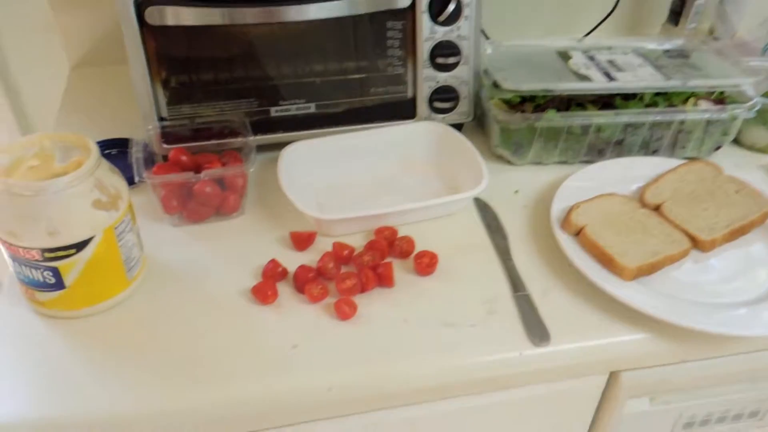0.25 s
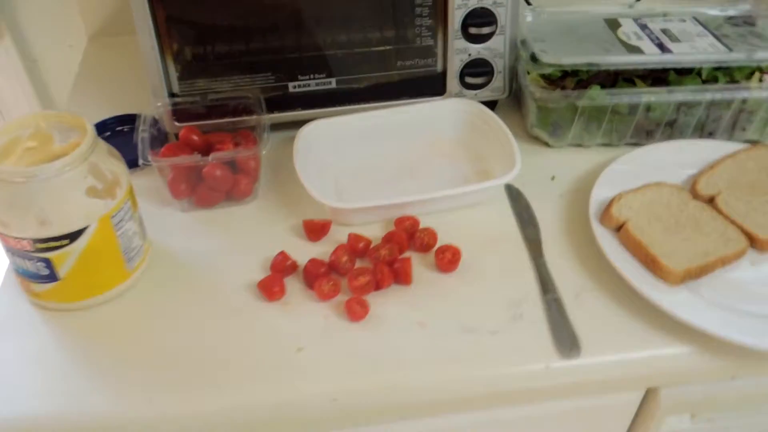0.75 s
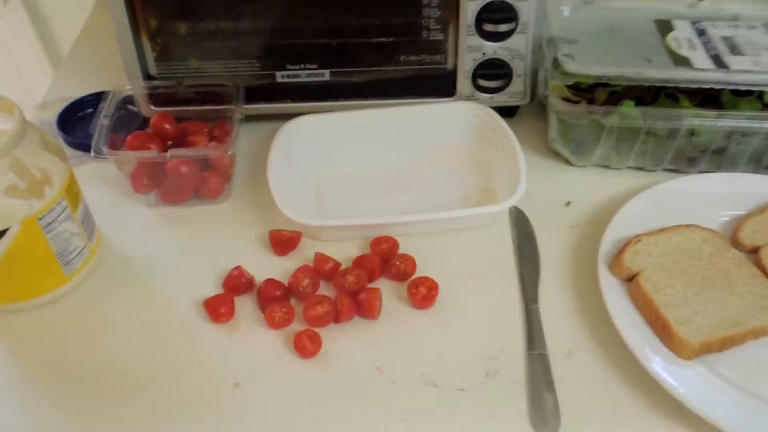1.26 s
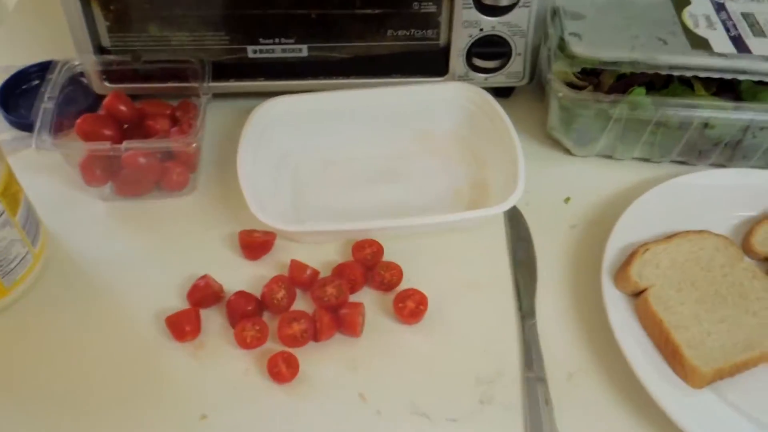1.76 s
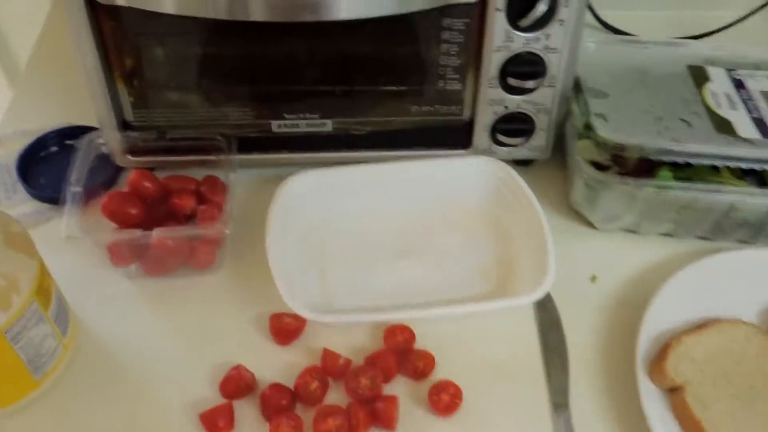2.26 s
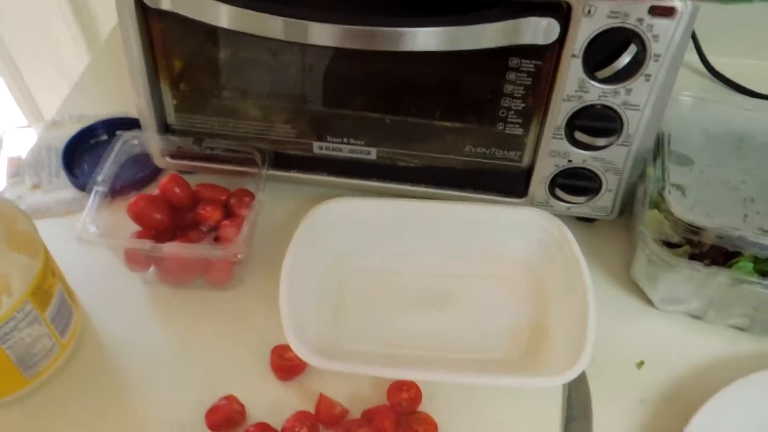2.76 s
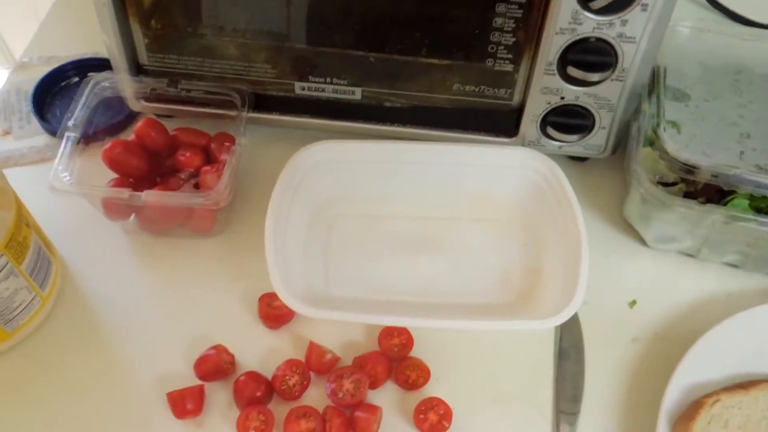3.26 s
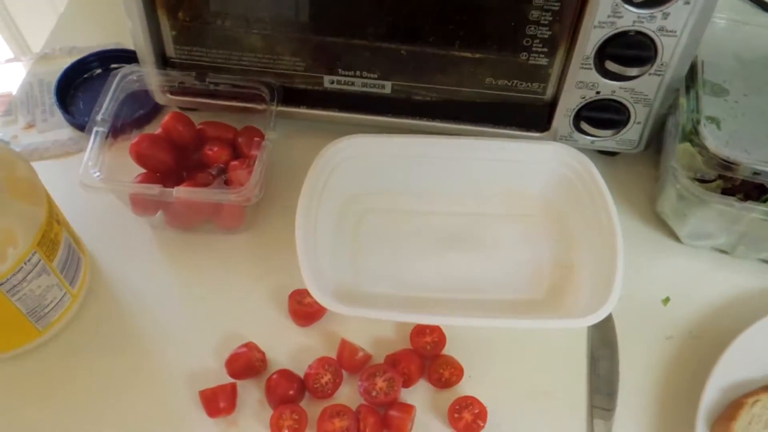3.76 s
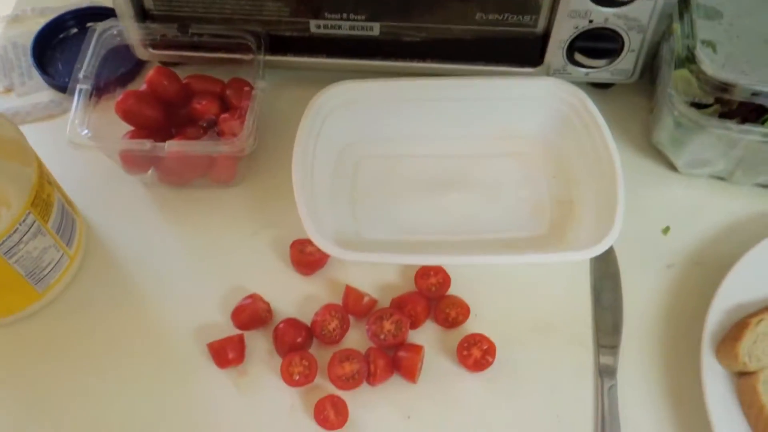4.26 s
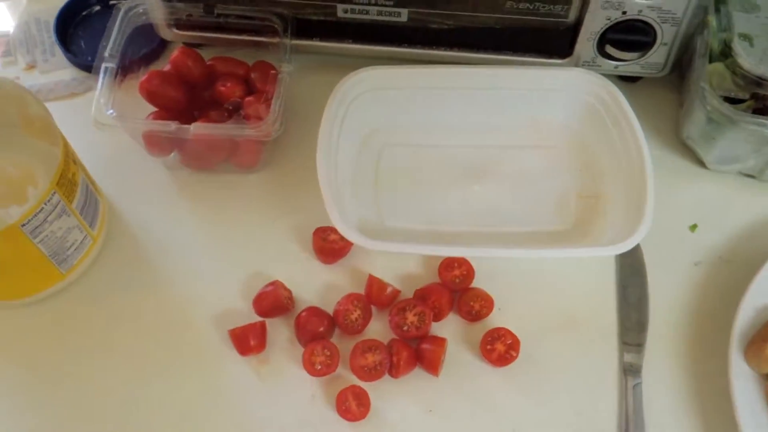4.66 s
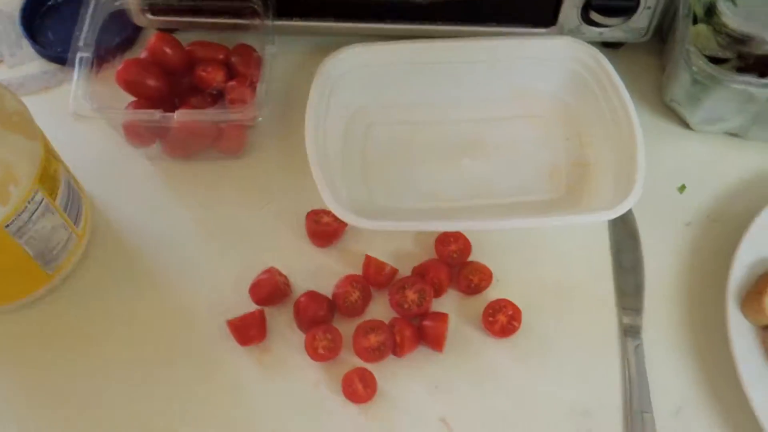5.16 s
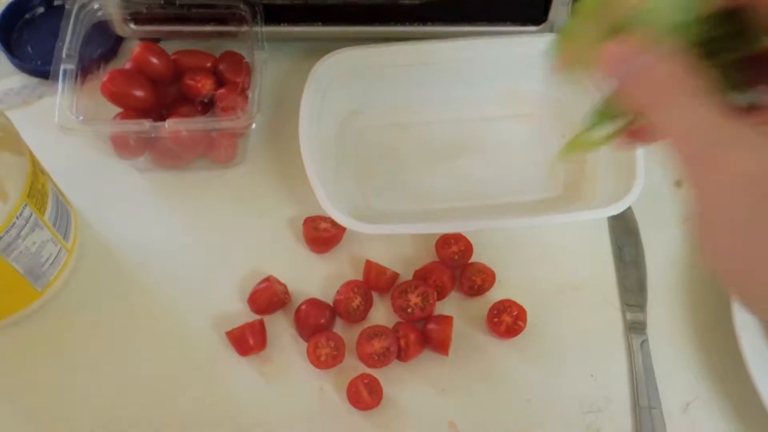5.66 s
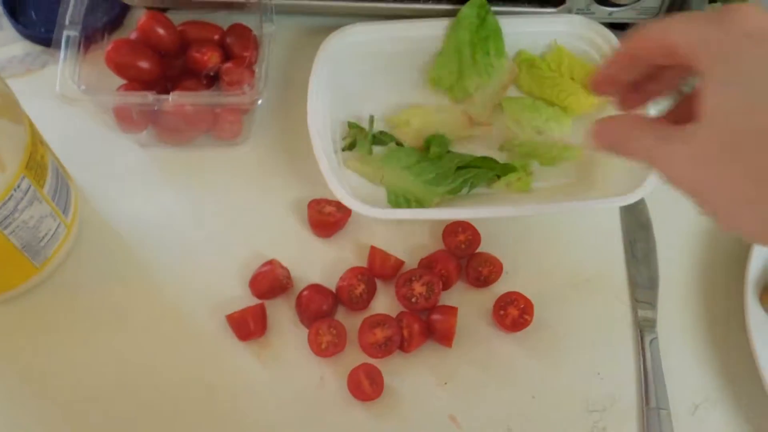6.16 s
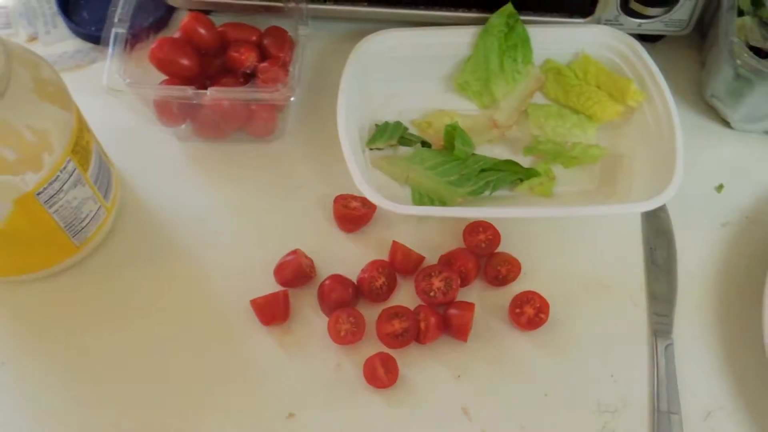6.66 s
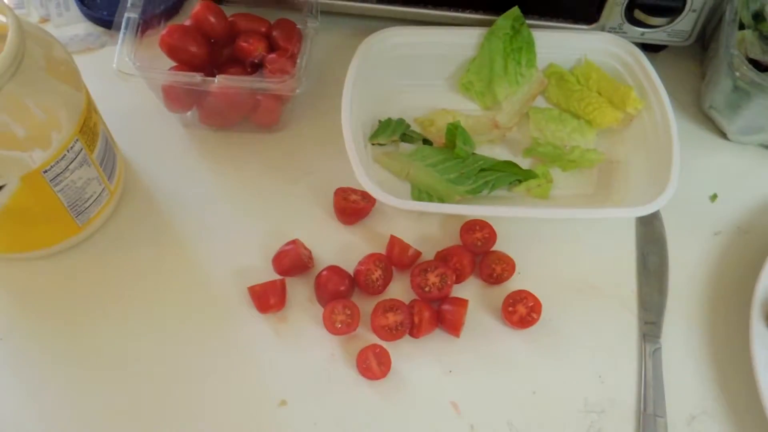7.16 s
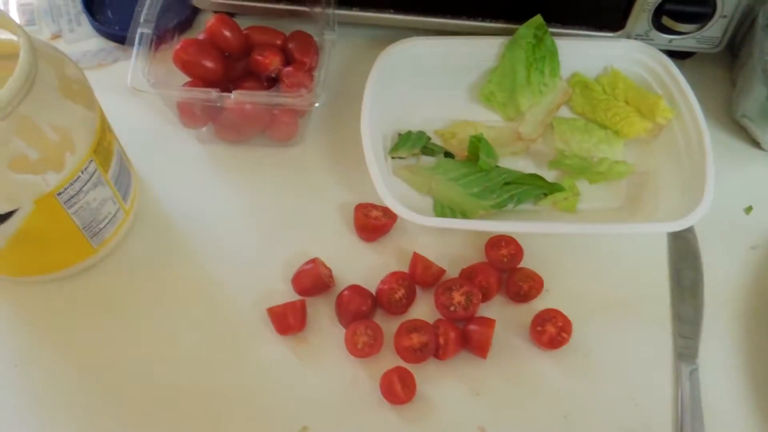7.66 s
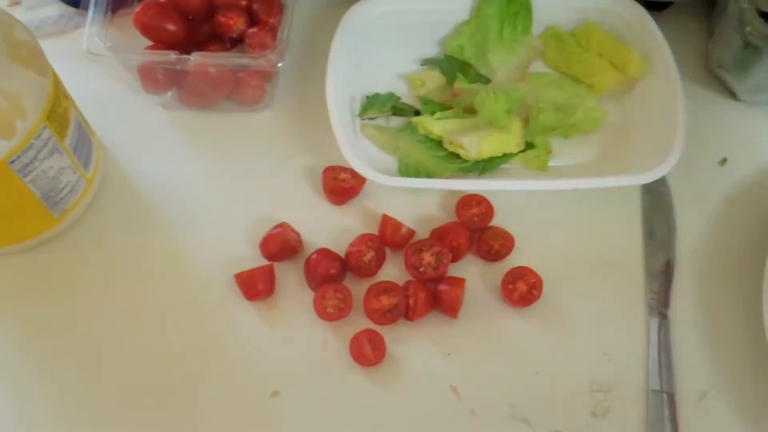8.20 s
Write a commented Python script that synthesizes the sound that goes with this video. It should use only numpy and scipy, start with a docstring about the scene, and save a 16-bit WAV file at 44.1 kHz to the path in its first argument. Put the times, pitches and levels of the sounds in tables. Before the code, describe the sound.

A small, quiet kitchen heard close up in stereo, with soft room noise and a faint low appliance hum throughout. From 0.3 to 2.6 seconds a sleeve brushes in weak, airy swishes, with a few tiny snaps and pings around 1.2 and 2.1. At 2.7 a hand abruptly digs into salad in a thin plastic box: dense, irregular rustling, crisp crackles, stalk snaps, bright plastic ticks and a few hollow box bumps, with a sharp snap at 5.1, fading by 5.6. Around 6.05 a handful drops into an empty plastic tub, a quick cluster of leafy slap, hollow thump and rattle with a short low boom, settling by 6.25. Near quiet until 6.8, then a second, shorter dig crackles until 7.6, with its loudest snap at 7.2. At 8.1 another handful lands more softly, cushioned by leaves. A light room echo follows the close sounds.

```python
"""A small kitchen, heard from close by on a camera's two microphones: filtered room noise over a hum of sine tones.
First a sleeve brushes past, as swells of hiss, among a few faint snaps and pings of noise bursts.
Then a hand digs into a thin plastic box of salad: grainy noise rustles, short tones crinkle, stalks and box snap.
A handful drops into an empty plastic tub on the counter, with a decaying sine boom and ringing noise.
The hand digs again and a second handful drops; the kitchen answers all but the room noise and hum."""
import sys
import numpy as np
from scipy import signal
from scipy.fft import rfft, irfft, next_fast_len
from scipy.io import wavfile
from scipy.ndimage import uniform_filter1d, map_coordinates

SR = 44100
rng = np.random.default_rng(int(sys.argv[2]) if len(sys.argv) > 2 else 0)


def file_out(sig):
    """Save sig as 16-bit WAV at sys.argv[1]."""
    # one column per channel
    cols = np.atleast_2d(sig).T
    # limit, then scale
    lim = np.clip(cols, -1, 1)
    pcm = np.round(lim * 32767).astype(np.int16)
    wavfile.write(sys.argv[1], SR, pcm)


N = 371763  # length of the scene [samples]

# Spectrum of the room noise: (frequency [Hz], relative level [dB per Hz])
AIR_SPECTRUM = [(15, -57), (25, -11), (49, -4.5), (130, -16.5), (199, -8), (234, -6.5), (260, -11),
                (420, -13.5), (455, -16), (818, -15.5), (959, -18), (1220, -22), (3350, -30),
                (12700, -33.5), (14500, -36)]
# Stereo width of the room noise: (frequency [Hz], side minus mid [dB])
AIR_WIDTH = [(60, -10.5), (300, -11.5), (1000, -7.5), (2500, -2), (14000, 1.5)]
# Tones of the appliance hum: (frequency [Hz], level [dB])
HUM_TONES = [(59.2, -47.5), (199.2, -54), (269.2, -60), (355.3, -60), (414.5, -60), (802.1, -61.5)]
# A sleeve brushes past as the cook moves: (middle [s], half-length [s], peak level [dB])
SLEEVE_SWISHES = [(0.308, .05, -50.5), (0.745, .025, -51), (0.9, 0.066, -47.5), (1.22, .06, -44),
                  (1.4, 0.074, -46.5), (1.655, 0.085, -42.5), (1.866, .025, -47.5), (1.997, 0.066, -52),
                  (2.16, 0.05, -46), (2.481, 0.043, -39.5), (2.564, 0.075, -49.5)]
# Spectrum of sliding cloth: (frequency [Hz], relative level [dB per Hz])
CLOTH_SPECTRUM = [(800, 4), (2500, -6), (3900, 0), (6500, -2), (8500, -1.5), (10800, 0), (14300, 0)]
# Echo of the kitchen: (frequency [Hz], time to fall by 60 dB [s])
KITCHEN_DECAY = [(200, 0.5), (1400, 0.94), (4000, 0.68), (12000, 0.33)]
# Taut patches of thin plastic ping as they flex: (time [s], level [dB], pitch [Hz])
PLASTIC_PINGS = [(1.1954, -33.5, 1540), (1.1926, -31.5, 2700), (2.0648, -39, 1400), (2.7348, -10, 9030),
                 (2.9454, -20.5, 2130), (3.6172, -27, 11000), (4.4095, -19, 12400), (4.5117, -22, 12500),
                 (4.6639, -29, 11400), (5.081, -18, 11400), (5.1385, -23, 3320), (7.2203, -5.5, 11300),
                 (7.36, -20.5, 2020), (7.5459, -20.5, 1950), (7.5458, -26, 4000), (7.756, -41, 2980),
                 (7.9974, -45, 3400)]
# The loudest snaps of stalks and thin plastic: (time [s], strength [dB], brightness [dB])
SNAP_EVENTS = [(1.195, -40, 2), (1.429, -50, -12), (2.0664, -38, -15.5), (2.132, -41.5, -14.5),
               (2.187, -46, -17), (2.7102, -24, -0.5), (2.7291, -25, -13), (2.7349, -22, 2),
               (2.74, -33.5, 12), (2.7645, -24, 1), (2.7791, -20, -0.5), (2.818, -27.5, 6),
               (2.8898, -25, -5), (2.9459, -26, 5), (2.978, -30, -8), (2.998, -30, -10),
               (3.0074, -31, -12.5), (3.0244, -30.5, 4), (3.1441, -26.5, -8), (3.2591, -24, 2),
               (3.274, -21, 2), (3.2809, -28, -8), (3.3123, -23, -1), (3.3249, -26, 3.5),
               (3.4185, -26.5, 3.5), (3.6182, -38, 9), (3.6938, -30, -3), (3.746, -22, 2),
               (3.7839, -23.5, 0.5), (3.9726, -25.5, -0.5), (4.0995, -21.5, -6), (4.2428, -32, 5),
               (4.266, -34, -15), (4.2931, -19.5, 0.5), (4.4193, -23.5, 4.5), (4.4413, -24, 4),
               (4.5126, -30, 4), (4.5956, -31, -9.5), (4.6639, -30, -1), (4.6781, -26, -0.5),
               (4.8469, -31.5, 2), (4.9329, -33, -0.5), (4.9602, -31, -15.5), (5.0744, -22.5, -0.5),
               (5.08, -27.5, 0), (5.1376, -15, 1.5), (5.1963, -32.5, 10), (5.2375, -30, 4.5),
               (5.2544, -30, -4), (5.34, -38, -19.5), (5.51, -40, -3), (5.5327, -36, -11),
               (5.5976, -42.5, 8.5), (5.8282, -46.5, -6), (5.982, -33.5, -3), (6.0422, -23.5, -2.5),
               (6.0581, -23, -9), (6.0807, -18.5, -14), (6.1629, -33.5, -19.5), (6.2243, -34.5, -3),
               (6.9247, -26.5, -2.5), (7.0164, -22.5, -6.5), (7.0334, -22, -8), (7.0394, -23.5, -9),
               (7.0661, -19.5, -5), (7.1174, -26, -0.5), (7.2204, -15, -3), (7.2382, -33.5, 15),
               (7.2801, -25.5, 5), (7.3592, -23, 5.5), (7.3812, -32, -12), (7.441, -28.5, -8.5),
               (7.4646, -28.5, 2.5), (7.524, -38, 8), (7.5455, -21.5, 0), (7.6742, -40.5, 16.5),
               (7.7542, -45.5, -21), (7.814, -45, -14), (8.103, -22.5, -10.5), (8.1237, -30.5, -10.5),
               (8.2197, -39, -10)]
# Spectra of the three parts of a snap: (frequency [Hz], relative level [dB per Hz])
KNOCK_SPECTRUM = [(120, -32), (300, -0.5), (800, 3), (1400, 5), (2200, -5.5), (5000, -50)]
CRACK_SPECTRUM = [(500, -52), (1100, -77), (1700, -0.5), (3100, 5), (5200, 0.5), (7500, -3.5), (14000, -39)]
TICK_SPECTRUM = [(2000, -63), (4200, -12.5), (6000, 1.5), (9000, 3), (12000, 9), (14500, 2.5)]
# Decay times of a snap: (knock [s], crack [s], tick [s])
SNAP_DECAYS = (.0022, .0013, .0011)
# Rustles of the leaves as the hand moves them or they land in the tub, the two long ones its steady
# digging: (start [s], length [s], leaves level [dB], rub on the plastic level [dB])
LEAF_RUSTLES = [(2.69, 2.75, -40, -46), (2.693, 0.092, -25, -32), (2.858, 0.24, -36.5, -43),
                (3.09, 0.064, -31.5, -47), (3.192, 0.13, -25.5, -31), (3.453, 0.064, -26.5, -35),
                (3.661, 0.037, -33, -37), (3.73, 0.13, -34.5, -41.5), (3.939, 0.057, -33, -39),
                (4.056, 0.051, -26, -29), (4.239, 0.076, -28.5, -32.5), (4.376, 0.067, -22.5, -31.5),
                (4.635, 0.062, -28, -34.5), (4.93, 0.047, -30.5, -35.5), (5.049, 0.21, -30, -34.5),
                (5.268, 0.2, -39.5, -39), (5.474, 0.07, -32, -37.5), (5.563, 0.11, -48, -58),
                (5.86, 0.066, -46, -61), (5.967, 0.037, -30.5, -62), (6.025, 0.062, -21.5, -24.5),
                (6.12, 0.13, -42.5, -40), (6.827, 0.78, -32.5, -41.5), (6.897, .16, -27, -33.5),
                (7.068, 0.047, -20, -28), (7.225, 0.039, -23.5, -37), (7.591, 0.066, -30.5, -48),
                (7.972, .03, -39, -66), (8.059, 0.034, -24, -41), (8.15, 0.087, -44.5, -47.5)]
# Spectrum of the rustling leaves: (frequency [Hz], relative level [dB per Hz])
LEAF_SPECTRUM = [(700, -27), (1400, -8.5), (2000, -2), (3000, 0), (4500, -0.5), (7000, -2), (10000, 0),
                 (12300, 2), (14500, -6.5)]
# Resonances of the rubbed salad box: (frequency [Hz], width [Hz], relative level [dB])
BOX_MODES = [(161, 95, -2.5), (295, 207, -0.5), (416, 75, 0), (696, 81, 0), (910, 96, 2.5), (1140, 910, -6)]
# The hand bumps the salad box: (time [s], level [dB])
BOX_BUMPS = [(2.8877, -24.5), (2.9089, -25), (2.926, -33), (3.008, -35.5), (3.257, -32), (4.293, -43)]
# Resonances of the bumped salad box: (frequency [Hz], width [Hz], relative level [dB])
HOLLOW_MODES = [(174, 33, -1), (270, 54, -2.5), (840, 84, -1.5), (2830, 130, -9.5)]
# Leaves land in the tub: (time [s], boom on the counter [dB], thump [dB], rattle [dB])
TUB_LANDINGS = [(6.040, -35, -31, -26), (6.058, -31, -22, -19), (6.08, -54, -42, -11),
                (6.092, -38, -41, -19.5), (6.163, -42, -34, -30), (6.226, -46, -39, -28),
                (8.086, -44, -39.5, -39), (8.111, -37, -57, -27), (8.133, -43, -43, -34),
                (8.221, -50, -44, -43)]
# Resonances of the tub's floor and walls: (frequency [Hz], width [Hz], relative level [dB])
TUB_FLOOR_MODES = [(195, 55, -17), (282, 78, 4), (396, 68, 1.5)]
TUB_WALL_MODES = [(980, 42, 1), (1180, 63, 0), (1700, 61, 0.5), (2750, 280, 3), (3270, 690, 2),
                  (3940, 450, -3)]
# Stereo width of the close sounds and their echo: (frequency [Hz], side minus mid [dB])
CLOSE_WIDTH = [(100, -34), (1000, -23.5), (2500, -40), (5200, -15), (7800, -4), (14000, -2)]
# Balance of the two microphones: (frequency [Hz], left minus right [dB])
MIC_BALANCE = [(60, -2), (700, -1.5), (2000, -0.3), (5000, 0), (8800, -1), (13000, -2)]
# Phase between the microphones: (frequency [Hz], lead of the left [rad])
MIC_PHASE = [(6000, -0.056), (9000, -0.4), (14000, -0.6)]

TOP_HZ = 14350  # upper limit of the camera's band
KNOCK_DB, TICK_DB = -11, 5.5  # against the crack, in a snap of brightness 0
RUSTLE_ATTACK_S, RUSTLE_RELEASE_S = 0.029, 0.037  # leaves give way quickly, then settle
CRINKLE_HZ, CRINKLE_OCTAVES, CRINKLE_CYCLES = 3610, 0.837, 4.2  # middle pitch, its scatter, decay
CRINKLE_DB, CRINKLE_SPREAD_DB = -3.5, 4  # against the rustle; scatter of size
CENTRE = np.array([[1], [0]])  # mid only, no side


def amp(db):
    """Decibels to gain."""
    return 10 ** (np.asarray(db) / 20)


def unit(x):
    """Scaled to rms 1."""
    return x / np.sqrt(np.mean(x ** 2) + 1e-20)


def along(points, hz):
    """(Hz, value) points read on a log axis."""
    f, v = np.transpose(points)
    return np.interp(np.log(hz + 1), np.log(f + 1), v)


def wobble(rate):
    """A smooth random curve, rate knots a second."""
    knots = rng.standard_normal(int(N * rate / SR) + 4)
    return map_coordinates(knots, [np.arange(N) * rate / SR])


def filtered(x, response):
    """x times a complex response of frequency."""
    n = x.shape[-1]
    padded = next_fast_len(n + min(n // 2, 8192))
    spectrum = rfft(x, padded) * response(np.fft.rfftfreq(padded, 1 / SR))
    return irfft(spectrum, padded)[..., :n]


def coloured(x, spectrum):
    """x through a (Hz, dB) spectrum."""
    return filtered(x, lambda hz: amp(along(spectrum, hz)))


def resonate(x, modes):
    """x through a body's (Hz, width, dB) resonances, with alternating signs."""
    def response(f):
        total = 0
        for k, (centre, width, db) in enumerate(modes):
            damping = 1j * f * width
            total = total + (-1) ** k * amp(db) * damping / (centre * centre - f * f + damping)
        return total
    return filtered(x, response)


def add(track, s, sound):
    """Mixes a sound into the track at s seconds."""
    part = track[..., round(s * SR):][..., :sound.shape[-1]]
    part += sound[..., :part.shape[-1]]


def struck(sound, size):
    """Scaled so that the first size samples have rms 1."""
    return sound / np.sqrt(np.mean(sound[..., :size] ** 2, axis=-1, keepdims=True) + 1e-20)


def background(air_db=-45, waver_db=0.1):
    """Soft room noise and the slightly unsteady hum of an appliance."""
    t = np.arange(N) / SR
    hum = np.zeros(N)
    for hz, db in HUM_TONES:
        level = amp(db + waver_db * wobble(2.9)) * np.sqrt(2)  # rms to peak
        hum += level * np.sin(2 * np.pi * hz * t + 0.36 * wobble(2))
    noise = unit(coloured(rng.standard_normal((2, N)), AIR_SPECTRUM))
    air = amp(air_db + 0.45 * wobble(11.0)) * noise
    return air + hum * CENTRE


def sleeve():
    """Cloth slides in soft swells of fine hiss."""
    t = np.arange(N) / SR
    speed = sum(amp(db) * np.exp(-((t - s) / half) ** 2) for s, half, db in SLEEVE_SWISHES)
    return speed * unit(coloured(rng.standard_normal((2, N)), CLOTH_SPECTRUM))


def kitchen(x, delay=0.0034):
    """Cupboards and walls answer after delay seconds; each frequency dies at its own speed."""
    hz, t, z = signal.stft(rng.standard_normal((2, SR // 2)), SR, nperseg=256)
    decay = amp(-60 * t / along(KITCHEN_DECAY, hz)[:, None])
    tail = signal.istft(z * decay, SR, nperseg=256)[1]
    tail = tail * (np.arange(tail.shape[1]) > delay * SR)
    # the mid alone excites the room
    return signal.fftconvolve(x[:1], tail / np.linalg.norm(tail[0]), axes=1)[:, :N]


def pings(life=0.0025, sharpness=7):
    """A sudden flex, a burst of noise, rings one small stiff patch of plastic."""
    out, t = np.zeros((2, N)), np.arange(SR // 32) / SR
    for s, db, hz in PLASTIC_PINGS:
        flex = np.exp(-t / life) * rng.standard_normal((2, len(t)))
        ring = resonate(flex, [(hz, hz / sharpness, 0)])
        add(out, s, amp(db) * struck(ring, size=220))
    return out


def snaps(rise=0.00031, scatter_db=-20, ragged_db=4.0, echo=0.36):
    """A ragged burst of a few ms, then its scatter among the leaves; brighter ones tick more, knock less."""
    out, t = np.zeros((2, N)), np.arange(1536) / SR
    scatter = amp(scatter_db) * np.exp(-t / .007)
    for s, strength_db, bright_db in SNAP_EVENTS:
        roughness = unit(uniform_filter1d(rng.standard_normal(len(t)), size=16))
        ragged = (1 - np.exp(-t / rise)) * amp(ragged_db * roughness)
        # a wall a few cm away colours every snap differently
        noise = rng.standard_normal((2, len(t)))
        noise = noise + echo * np.roll(noise, rng.integers(6, 40), axis=1)
        spectra = (KNOCK_SPECTRUM, CRACK_SPECTRUM, TICK_SPECTRUM)
        levels = (KNOCK_DB - bright_db, 0, TICK_DB + bright_db)
        for spectrum, db, life in zip(spectra, levels, SNAP_DECAYS):
            shape = ragged * (np.exp(-t / life) + scatter)
            burst = struck(shape * coloured(noise, spectrum), size=220)
            add(out, s, amp(strength_db + db) * burst)
    return out


def rustle_gains():
    """Gains of leaves and plastic over time: each rustle swells, holds and dies away; their powers add."""
    t, power = np.arange(N) / SR, np.zeros((2, N))
    for s, length, leaves_db, box_db in LEAF_RUSTLES:
        swell = np.clip((t - s) / RUSTLE_ATTACK_S, 0, 1) ** 2
        settle = np.exp(-np.clip(t - s - length, 0, 1) / RUSTLE_RELEASE_S)
        power += (amp([[leaves_db], [box_db]]) * swell * settle) ** 2
    return np.sqrt(power)


def crackle(rate, spread_db, life, bed):
    """Mid and side noise of tiny fractures, rate a second and random in size, on a bed of smooth sliding."""
    happens = rng.random(N) < rate / SR
    sizes = happens * amp(spread_db * np.minimum(rng.exponential(size=N), 3))
    # the power of each fracture decays over life seconds
    power = signal.lfilter([1], [1, -np.exp(-1 / (life * SR))], sizes ** 2)
    return np.sqrt(power / power.mean() + abs(bed)) * rng.standard_normal((2, N))


def crinkles(gain, count=700):
    """Small buckles ring at random moments and pitches, their strength following the rustle of the leaves."""
    out, t = np.zeros(N), np.arange(SR // 100) / SR
    moments, sizes, pitches = rng.random(count), rng.exponential(size=count), rng.standard_normal(count)
    for when, size, pitch in zip(moments, sizes, pitches):
        hz = min(CRINKLE_HZ * 2 ** (CRINKLE_OCTAVES * pitch), TOP_HZ)
        ring = np.sin(2 * np.pi * hz * t) * np.exp(-hz * t / CRINKLE_CYCLES)
        level = gain[int(when * N)] * amp(CRINKLE_DB + CRINKLE_SPREAD_DB * min(size, 3.5))
        add(out, when * N / SR, level * ring)
    return out


def rustling():
    """Leaves slide and crackle over each other, dug or landing, with a rub coloured by the box's resonances."""
    leaves_gain, box_gain = rustle_gains()
    leaves = unit(coloured(crackle(rate=500, spread_db=6, life=.0008, bed=.45), LEAF_SPECTRUM))
    box = unit(resonate(crackle(rate=300, spread_db=4.5, life=0.0015, bed=0.64), BOX_MODES))
    return leaves_gain * leaves + box_gain * box + crinkles(leaves_gain) * CENTRE


def bumps(life=0.0026):
    """The half-full box answers a nudge, a burst of noise, with a hollow knock."""
    out, t = np.zeros((2, N)), np.arange(SR // 8) / SR
    for s, db in BOX_BUMPS:
        nudge = np.exp(-t / life) * rng.standard_normal((2, len(t)))
        add(out, s, amp(db) * struck(resonate(nudge, HOLLOW_MODES), size=440))
    return out


def tub(boom_hz=122, boom_t60=0.19, boom_rise=0.0077, push_life=0.0084, slap_life=0.0048):
    """The tub bounces on the counter; the leaves' push thumps its floor and their slap rattles its walls."""
    out, t = np.zeros((2, N)), np.arange(SR // 4) / SR
    boom_shape = amp(-60 * t / boom_t60) * (1 - np.exp(-t / boom_rise))
    boom = np.sin(2 * np.pi * boom_hz * t) * boom_shape
    for s, boom_db, thump_db, rattle_db in TUB_LANDINGS:
        push = np.exp(-t / push_life) * (1 + 0.76 * rng.standard_normal((2, len(t))))
        slap = np.exp(-t / slap_life) * rng.standard_normal((2, len(t)))
        add(out[0], s, amp(boom_db) * struck(boom, size=880))  # mid only
        add(out, s, amp(thump_db) * struck(resonate(push, TUB_FLOOR_MODES), size=880))
        add(out, s, amp(rattle_db) * struck(resonate(slap, TUB_WALL_MODES), size=350))
    return out


def microphones(mid, side):
    """Left and right microphones differ a little in level and phase, half of it applied to each."""
    def lead(hz):
        return amp(along(MIC_BALANCE, hz) / 2) * np.exp(.5j * along(MIC_PHASE, hz))
    left = filtered(mid + side, lead)
    right = filtered(mid - side, lambda hz: 1 / lead(hz))
    return np.array([left, right])


def scene(room_db=-11):
    """Close sounds and their echo, then room noise and hum, each given its width and sent to the microphones."""
    air_mid, air_side = background()
    crisp = sleeve() + snaps() + rustling()
    plastic = pings() + bumps() + tub()
    # the containers face the camera, so less of their ring goes round the room
    wet = kitchen(crisp + .55 * plastic)
    mid, side = crisp + plastic + amp(room_db) * wet
    return microphones(mid + air_mid, coloured(side, CLOSE_WIDTH) + coloured(air_side, AIR_WIDTH))


def record(dry):
    """The camera rounds off the loudest peaks and cuts steeply above its band limit."""
    held = dry / (1 + np.abs(dry / 1.05) ** 8) ** (1 / 8)
    return filtered(held, lambda hz: 1 / (1 + (hz / TOP_HZ) ** 160))


dry = scene()
out = record(dry)
file_out(out)
```